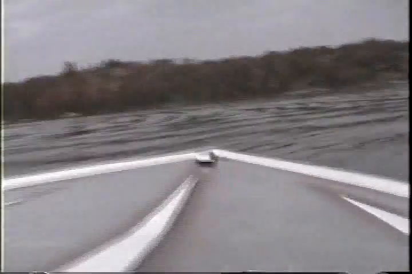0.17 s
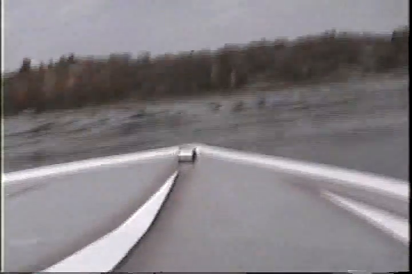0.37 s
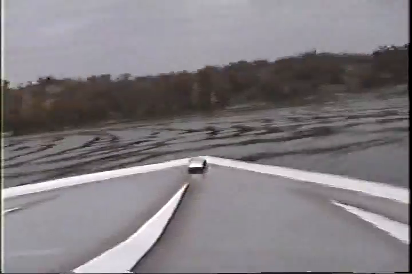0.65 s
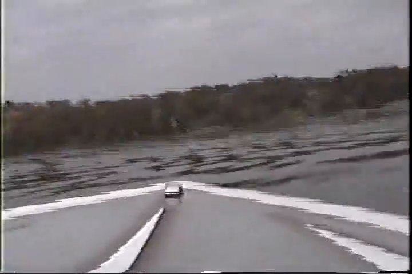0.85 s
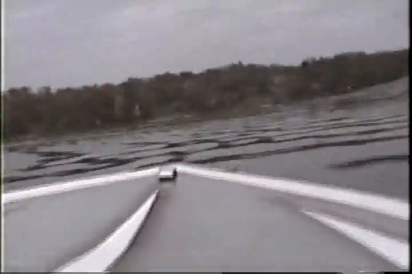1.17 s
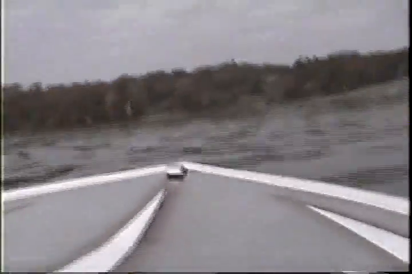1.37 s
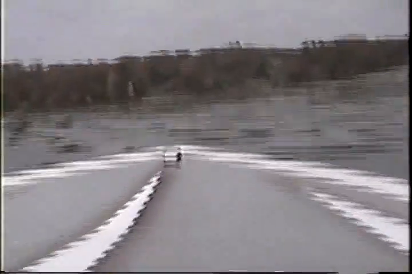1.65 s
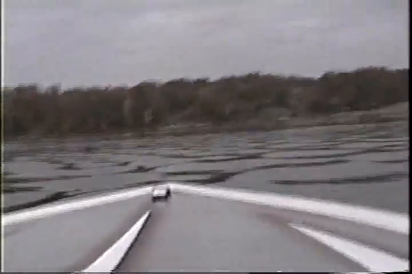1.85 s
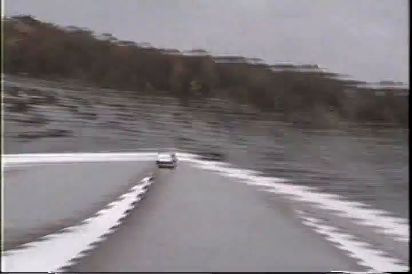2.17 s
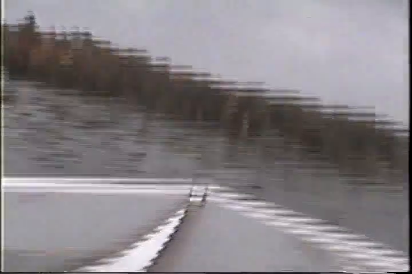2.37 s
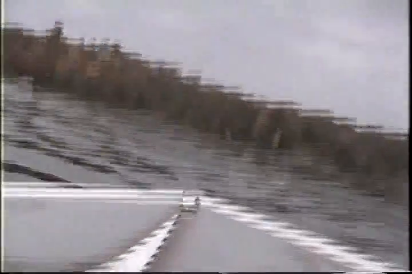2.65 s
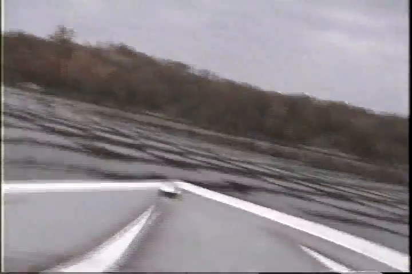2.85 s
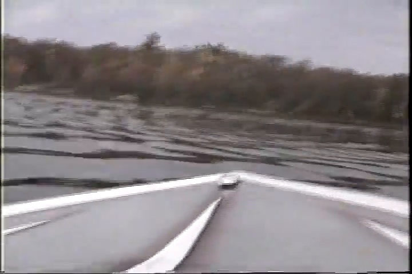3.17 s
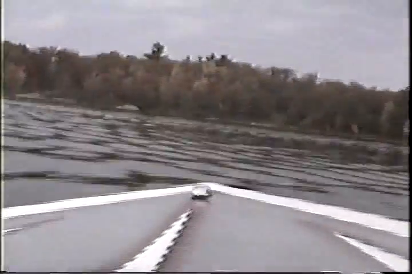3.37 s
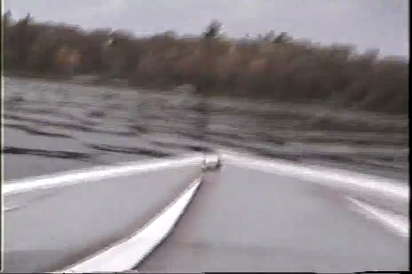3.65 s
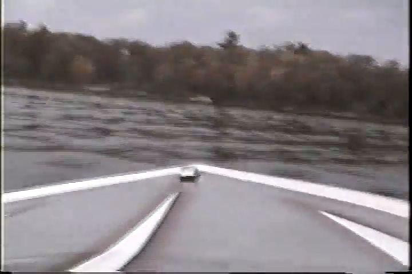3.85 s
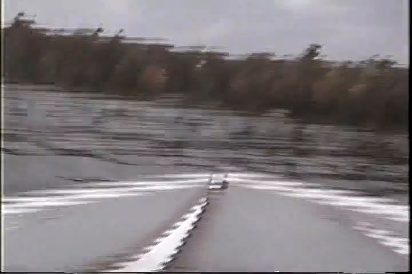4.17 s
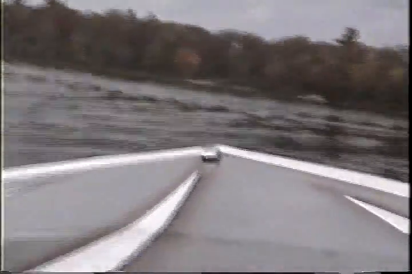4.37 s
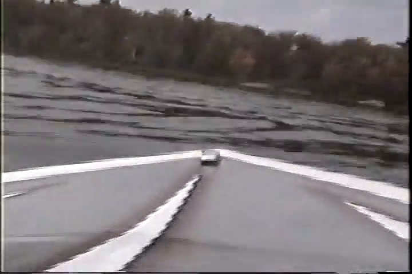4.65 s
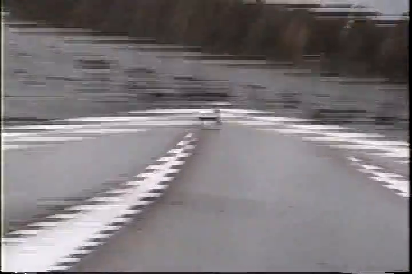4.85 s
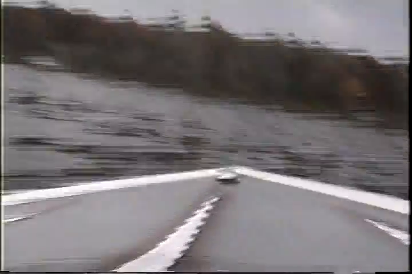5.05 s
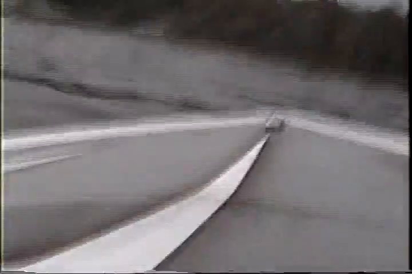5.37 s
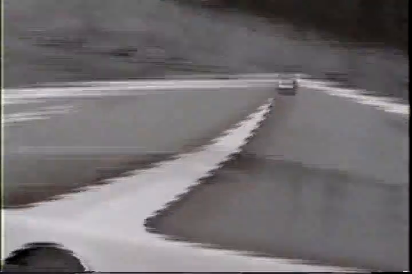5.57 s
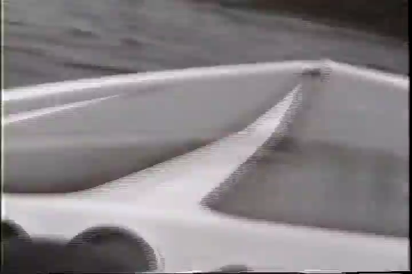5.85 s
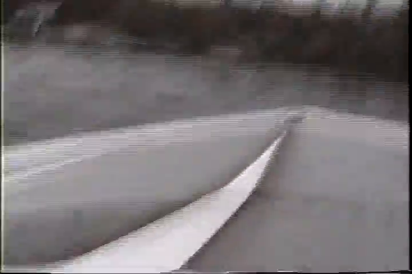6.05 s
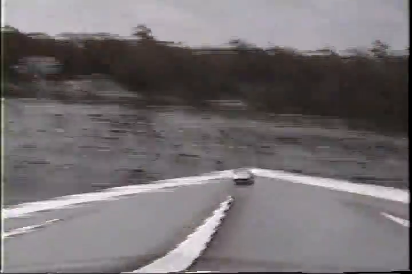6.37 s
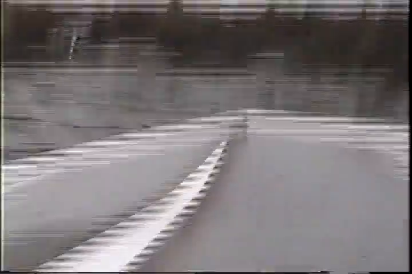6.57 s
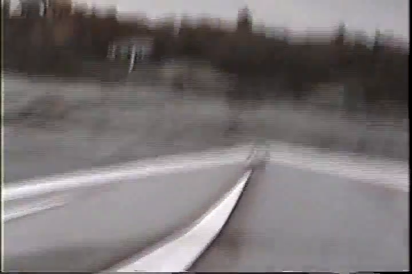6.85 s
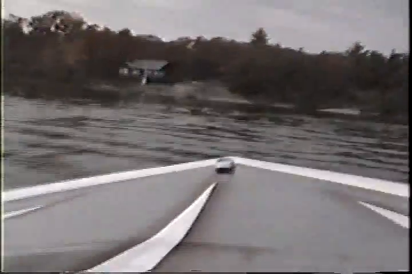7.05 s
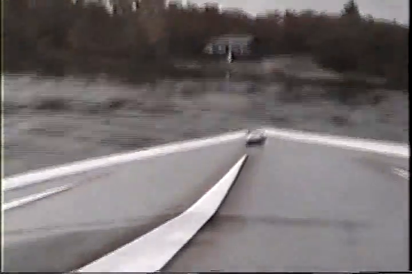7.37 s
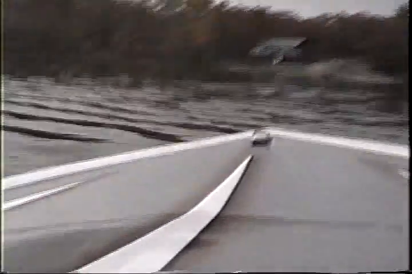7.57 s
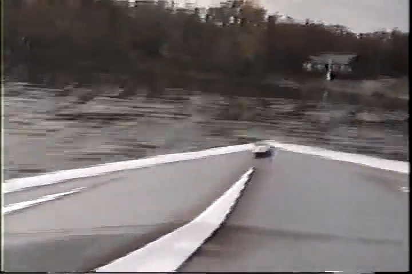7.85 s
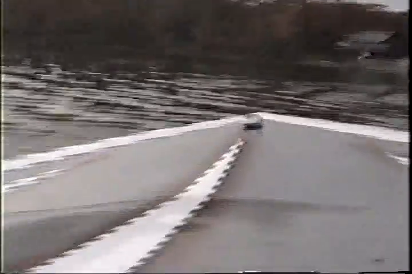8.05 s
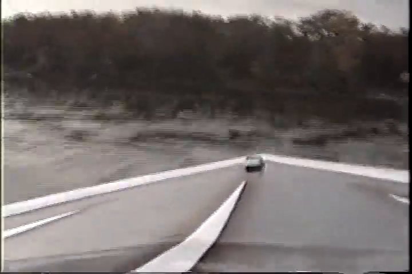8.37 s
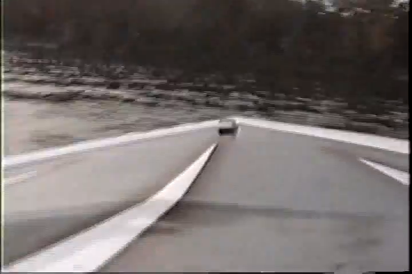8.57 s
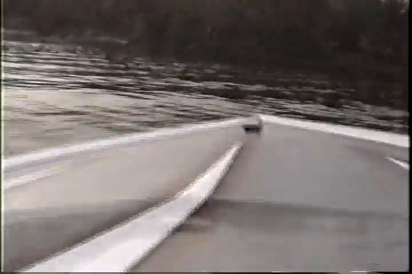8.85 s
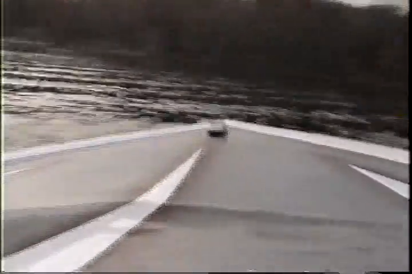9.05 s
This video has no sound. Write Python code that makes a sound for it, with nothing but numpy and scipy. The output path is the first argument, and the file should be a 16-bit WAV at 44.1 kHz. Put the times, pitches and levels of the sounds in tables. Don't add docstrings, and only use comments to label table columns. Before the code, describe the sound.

Open-exhaust V8 boat engine holds a hard, buzzing note that sinks slightly twice, with wash hiss, wind buffets, hull slaps and metallic knocks close by.

```python
import sys
import numpy as np
from scipy import signal
from scipy.fft import rfft, irfft, next_fast_len
from scipy.io import wavfile

SR = 44100
rng = np.random.default_rng(int(sys.argv[2]) if len(sys.argv) > 2 else 0)


def digitize_waveform(pressure):
    field = np.atleast_2d(pressure).T
    bounded = np.clip(field, -1, 1)
    quanta = np.round(bounded * 32767).astype(np.int16)
    wavfile.write(sys.argv[1], SR, quanta)


N = 406161
T = np.arange(N) / SR


def undb(db):
    return np.exp(np.asarray(db) * np.log(10) / 20)


def unit(x):
    return x / np.sqrt(np.mean(np.abs(x) ** 2))


def curve(table):
    s, value = np.transpose(table)
    return np.interp(T, s, value)


def hiss():
    return rng.standard_normal(N)


def colour(x, points):
    hz, db = np.transpose(points)
    size = next_fast_len(N)
    log_f = np.log(np.arange(size // 2 + 1) * SR / size + 1)
    gain = undb(np.interp(log_f, np.log(hz), db))
    return unit(irfft(rfft(x, size) * gain, size)[:N])


def sieve(x, order, hz, kind):
    return signal.sosfilt(signal.butter(order, hz, kind, fs=SR, output="sos"), x)


def band(x, lo_hz, hi_hz):
    return unit(sieve(x, 2, [lo_hz, hi_hz], "band"))


def walk(rate):
    levels = rng.standard_normal(1000)
    return np.interp(T * rate, np.arange(len(levels)), levels)


def grains(per_s, spread_db):
    return (rng.random(N) < per_s / SR) * hiss() * undb(spread_db * rng.exponential(size=N))


def bursts(events, floor_db, rise_s, fall_s):
    gain = undb(floor_db + 1.3 * walk(2.0))
    for s, db in events:
        gain = gain + undb(db) * np.exp(np.where(T < s, (T - s) / rise_s, (s - T) / fall_s))
    return gain


# frequency in Hz, level in dB per Hz.
MURMUR_SPECTRUM = [(5, 0), (60, -12), (250, -26), (1000, -30), (4000, -35), (16000, -42)]


def murmur():
    return undb(-82) * colour(hiss(), MURMUR_SPECTRUM)


def scan_whistle():
    return undb(-66) * np.sin(2 * np.pi * 15734.3 * T + .8 * walk(60)) * undb(3 * walk(40))


# time in seconds, peak in dB.
TAPE_DROPOUTS = [(0.727, -47), (2.6, -43), (2.6662, -45), (3.0998, -42.5), (4.5345, -52), (5.3022, -47.5),
                 (5.6026, -45.5), (5.7687, -46.5), (5.9862, -41.5), (6.7036, -55), (6.8206, -45),
                 (7.9383, -51.5), (8.252, -40), (8.3553, -49.5), (8.3718, -49.5), (0.6973, -49.5),
                 (0.9862, -54), (5.7035, -50)]


def dropouts():
    s, db = np.transpose(TAPE_DROPOUTS)
    lag_s, lift_db = .0015, 22.5
    out = np.zeros(N)
    out[((s + lag_s) * SR).astype(int)] = undb(db + lift_db)
    return sieve(out, 1, 6000, "high")


# time in seconds, peak in dB.
WIND_GUSTS = [(.1, -41), (.7, -56), (1.2, -48), (1.42, -26), (1.9, -39.5), (2.38, -43.5), (3.56, -39),
              (4.8, -40), (5.18, -29.5), (5.3, -35), (5.85, -25.5), (6.05, -38), (6.44, -26.5), (6.85, -24),
              (7.03, -37), (7.26, -36), (7.46, -44), (8.54, -31), (9.2, -54)]


def wind():
    return bursts(WIND_GUSTS, -54.5, rise_s=0.12, fall_s=0.021) * band(hiss(), 21, 73)


# time in seconds, peak in dB.
HULL_SLAPS = [(.3, -23.5), (1.25, -39), (2.35, -34), (2.7, -40), (3.0, -31.5), (3.3, -26), (4.0, -26),
              (4.8, -31.5), (5.3, -21), (5.85, -24), (6.2, -24.5), (6.38, -39), (6.5, -27.5), (6.9, -28.5),
              (7.05, -28), (7.95, -27), (1.1, -27.5), (2.05, -30.5)]


def slap_force():
    return bursts(HULL_SLAPS, -39.5, rise_s=0.055, fall_s=0.15)


def hull(slap):
    return slap * band(hiss(), 55, 220)


# time in seconds, peak in dB.
SPRAY_SHEETS = [(3.99, -59), (4.82, -56), (5.16, -52), (5.86, -51.5), (5.95, -51.5), (6.06, -54),
                (6.135, -62), (6.22, -61), (6.43, -58), (6.52, -54.5), (7.01, -62), (7.14, -63),
                (7.23, -74)]


def sheets():
    return bursts(SPRAY_SHEETS, -71.5, rise_s=0.017, fall_s=0.027) * band(hiss(), 6900, 8900)


def valve(cycle):
    turn = cycle + 1 - .33
    size_db = -9.5 + 4 * rng.standard_normal(400)[turn.astype(int)]
    return undb(size_db) * np.exp(-(turn % 1) / 0.13)


# frequency in Hz, level in dB per Hz.
SPRAY_SPECTRUM = [(1180, -25), (2000, -11), (2180, -9), (2610, -12.5), (2740, -8.5), (3480, -5.5),
                  (4060, -8), (4580, -8), (7580, -15.5), (9710, -20.5), (12800, -35), (15400, -34)]


def spray(cycle, slap):
    swell = undb(0.77 * np.cos(2 * np.pi * cycle) * (-1 + 0.98 * walk(33)) + 1.2 * walk(13))
    swell = swell * (1 + valve(cycle))
    patter = np.minimum(signal.lfilter([1], [1, -.99], np.abs(grains(150, 2.9))), 2.2)
    wash = colour(unit(swell * hiss()) + 0.5 * unit(patter * hiss()), SPRAY_SPECTRUM)
    level_db = -50.5 + 8 * np.exp(-T / 2.77)
    return undb(level_db) * (1 + 2 * slap) * wash


def ring(hz, t):
    overtone = undb(-13.5) * np.exp(-t / 0.0029) * np.sin(2 * np.pi * 1.2 * hz * t)
    return np.sin(2 * np.pi * hz * t) + overtone


# time in seconds, peak in dB, ring in Hz, bright edge in dB.
DRY_TICKS = [(0.183, -26, 3900, -40), (0.2675, -33, 4280, -40), (0.324, -33, 3920, -32),
             (0.382, -39, 4400, -33), (0.5548, -28.5, 4550, -31.5), (0.6468, -26, 3860, -28.5),
             (0.726, -30, 5670, -21.5), (1.0114, -27, 3900, -28.5), (1.544, -31, 3580, -30.5),
             (1.8273, -29.5, 3930, -30.5), (2.592, -30.5, 4500, -26), (2.81, -32, 3920, -33),
             (4.273, -31.5, 4120, -23), (5.243, -25.5, 6350, -34), (5.2613, -25, 4520, -34.5),
             (5.757, -26.5, 5630, -31), (5.981, -28.5, 3550, -30.5), (6.133, -30, 3900, -25.5),
             (6.504, -25, 4130, -35), (6.896, -27.5, 3850, -32), (7.802, -37, 3710, -12.5),
             (8.247, -24.5, 6520, -25.5), (8.453, -25.5, 3700, -38.5), (8.9466, -32.5, 6130, -34),
             (0.582, -26.5, 3340, -29), (0.928, -30, 4280, -34), (0.9835, -27.5, 3500, -27.5),
             (1.3648, -30, 3630, -34), (1.57, -28.5, 3300, -35), (2.0674, -34, 3550, -32),
             (2.251, -36, 3200, -27), (5.7423, -35.5, 6000, -32), (6.4278, -41, 7770, -30),
             (6.667, -41, 3300, -27), (7.1676, -41.5, 5000, -32), (0.0938, -36.5, 3520, -31),
             (1.7898, -36.5, 4040, -34), (2.6524, -33.5, 4000, -34.5), (3.1197, -37, 3810, -32),
             (4.5905, -39, 4080, -34.5), (4.866, -34, 3230, -34), (5.2465, -29, 4800, -31),
             (6.51, -37.5, 7900, -30.5), (7.236, -24, 2900, -35), (7.2316, -35, 8300, -33),
             (9.1157, -38.5, 4700, -31), (8.476, -32, 3600, -33), (8.513, -35, 4000, -33),
             (6.483, -38, 7600, -32)]
# time in seconds, peak in dB, ring in Hz, ring share from 0 to 1.
RINGING_KNOCKS = [
    (6.557, -26.5, 7900, 0.6),
    (7.2393, -19.5, 4100, 0.8),
    (7.463, -15.5, 6440, 0.6),
    (7.842, -21.5, 6260, 0.5),
    (8.252, -18, 6440, 0.9),
]


def ticks():
    out, t = np.zeros(N + SR), np.arange(SR // 10) / SR
    knocks = [(s, db, hz, .14, top_db) for s, db, hz, top_db in DRY_TICKS]
    knocks += [(*row, -32) for row in RINGING_KNOCKS]
    for s, db, hz, share, top_db in knocks:
        noise = rng.standard_normal(len(t))
        edge = sieve(noise, 3, 11000, "high") * 1.5 * 1000. ** (-t / 0.0059)
        snap = sieve(noise, 4, [2200, 5000 + .7 * hz], "band")
        snap = snap + 1.6 * sieve(noise, 2, [.78 * hz, 1.25 * hz], "band")
        metal = ring(hz, t) * 1000. ** (-t / .035)
        body = share * metal + (1 - share) * snap * np.exp(-t / 0.0056)
        body = body * 1000. ** (-t / 0.057) * (1 - np.exp(-t / 0.0021))
        start = int(s * SR)
        out[start:start + len(t)] += undb(db) * (body + undb(top_db) * edge)
    return out[:N]


# time in seconds, firing rate in Hz.
FIRING_RATE = [(0, 279.7), (1.0, 277.8), (1.25, 272.9), (1.5, 265.2), (1.75, 261.4), (2.0, 259.6),
               (2.6, 257.6), (3.25, 256.6), (5.0, 256.7), (5.17, 256.8), (5.31, 247.8), (5.45, 242.6),
               (5.59, 240.8), (5.85, 239.3), (6.7, 239.8), (7.4, 238.5), (8.4, 237.6), (9.21, 237.9)]


def crankshaft(hz):
    return np.cumsum(hz * (1 + .0007 * walk(14))) / 8 / SR


# strength in dB, lateness in firings.
CYLINDER_ORDER = [(3, 0.0107), (-5.5, 0.12), (-4.5, 0.1006), (-1, 0.018), (-7, 0.094), (5, 0), (-1, 0),
                  (-6.5, 0.14)]


def puffs(cycle, length, scatter_db):
    firing = (8 * cycle).astype(int)
    db = np.array(CYLINDER_ORDER)[firing % 8, 0] + scatter_db * rng.standard_normal(4000)[firing]
    return undb(db) * np.exp(-(8 * cycle % 1) / length)


def cracks(cycle):
    firing = (8 * cycle).astype(int)
    at = np.flatnonzero(np.diff(firing))
    cylinder = firing[at + 1] % 8
    size, slip = rng.standard_normal((len(at), 2)).T
    db, late = np.array(CYLINDER_ORDER)[cylinder].T
    path = 40 * rng.random(8)[cylinder]
    delay = np.clip(late * 170 + path + 1.2 * slip + 13, 0, 400).astype(int)
    pulses = np.zeros(N + SR)
    pulses[at + delay] = undb(.7 * db + 2.8 * size)
    return band(pulses[:N], 1500, 2670)


# frequency in Hz, level in dB per Hz.
ROAR_SPECTRUM = [(30, -15), (60, -8), (150, -5), (300, -5.5), (470, -9), (700, -9.5), (1100, -17),
                 (1600, -24.5), (2500, -42), (4000, -41), (8000, -62.5)]
# time in seconds, level in dB.
FRONT_SHARPNESS = [(0, -20.5), (1, -22), (2, -21), (3.2, -23.5), (4.4, -21.5), (5, -22), (6.2, -22),
                   (7, -22), (8.2, -20.5), (8.5, -19), (9.21, -20)]
ENGINE_SPEEDS = [
    239,
    257,
    278,
]
ROAR_LEVELS = [
    -26.5,
    -26.2,
    -24,
]


def roar(cycle, hz, slap):
    gas = colour((1.4 + puffs(cycle, .5, 3.6)) * hiss(), ROAR_SPECTRUM)
    gas = undb(-1) * gas * undb(1.4 * walk(5))
    fronts = undb(curve(FRONT_SHARPNESS) + .6 * walk(5)) * cracks(cycle)
    level = undb(np.interp(hz, ENGINE_SPEEDS, ROAR_LEVELS))
    return level * (1 + 2.6 * slap) * (gas + fronts)


# time in seconds, firing note in dB.
ENGINE_LOAD = [(0, -21), (.6, -21.5), (1.4, -18), (2.1, -17.5), (2.5, -17.5), (5.2, -17), (5.4, -18.5),
               (7.7, -18.5), (9.21, -17)]
FAST_ORDERS = [-32, -8, -13, -12, -8, -10, -17, 0, -17, -12, -14, -20, -13, -18, -28, -25, -18, -25, -16,
               -27, -24, -32, -27, -30, -25, -27, -22, -24, -19, -17, -34, -23, -23, -37, -20, -25, -35,
               -29, -30, -29, -31, -36, -26, -33, -34, -37, -36, -33, -40, -36, -40, -42, -41, -44, -46,
               -43, -45, -45, -50, -50, -46, -50, -43, -40]
CRUISE_ORDERS = [-34, -14, -18, -16, -9, -12, -23, 0, -16, -22, -19, -23, -20, -23, -25, -24, -22, -26, -24,
                 -31, -17, -29, -33, -28, -26, -33, -40, -27, -23, -32, -32, -27, -25, -29, -28, -31, -33,
                 -30, -36, -39, -40, -34, -36, -45, -37, -39, -40, -35, -41, -33, -44, -52, -38, -46, -50,
                 -44, -44, -41, -49, -54, -53, -40, -44, -47]
EASED_ORDERS = [-31, -11, -17, -12, -12, -10, -18, 0, -13, -17, -21, -24, -20, -19, -23, -25, -18, -22, -20,
                -31, -14, -20, -39, -20, -19, -23, -31, -37, -19, -39, -34, -21, -27, -22, -23, -27, -31,
                -26, -36, -32, -33, -26, -37, -32, -39, -31, -41, -38, -38, -45, -52, -54, -41, -50, -53,
                -56, -47, -44, -49, -46, -45, -48, -50, -52]
HULL_SWELLS = {2: [(7.1, 0.067, -3), (13, 0.33, 19.5)], 5: [(2.0, 0.3, -4), (5.1, 1, 3.5)],
               21: [(.4, 0.26, -14), (1.1, 0.37, -7), (2.05, 0.27, 5), (2.7, 0.28, -24), (4.5, 0.96, 1)],
               29: [(.4, 0.25, -2), (1.8, 0.088, 2), (2.05, 0.072, -2), (2.7, 0.21, 7.5), (3.6, 0.29, -7),
               (5.6, 0.37, 1.5)], 3: [(2, 0.31, -7), (5.7, 0.39, -8)], 4: [(1.3, 0.2, 4)],
               6: [(1.4, 0.22, -5), (1.1, .1, 5), (3.75, .2, 3), (5.2, .2, -3)], 8: [(.55, 0.14, 1.5),
               (6.4, 0.65, 1.2), (7.7, .5, 0.55)], 11: [(1.7, 0.87, -2)], 13: [(1.2, .4, -4), (3, .7, -3.5),
               (5.6, 0.33, -4), (7, 0.16, -6.5)], 15: [(1.3, 1.4, -13.5), (6.6, 0.49, 0.5)],
               18: [(1.1, 0.43, -1), (6.3, 0.88, -6)], 19: [(5.3, .5, -0.5)], 22: [(1.6, 0.53, 7.5),
               (5.5, .4, 7.6)], 27: [(2, 0.24, 19)], 28: [(7.3, 1.5, -7)], 30: [(1.3, 0.27, -3)],
               32: [(1.2, 0.92, -10), (2.6, .3, 8), (3.4, .3, 1)], 33: [(1.5, .8, -5.5)],
               35: [(1.3, .4, -11), (2.7, 0.37, -8)], 36: [(1.2, 1.2, -11)], 37: [(1.6, 0.66, 7.1)],
               38: [(1.7, 0.93, -9)]}


def swells(events):
    return sum(db * np.exp(-((T - s) / half_s) ** 2) for s, half_s, db in events)


def drone(cycle, hz):
    strength_db, late = np.transpose(CYLINDER_ORDER)
    fired = np.arange(8) + late
    out, rough = np.zeros(N), np.interp(hz, ENGINE_SPEEDS, [1, 1.1, 1.8])
    for k, levels_db in enumerate(zip(EASED_ORDERS, CRUISE_ORDERS, FAST_ORDERS), 1):
        start = np.angle(np.sum(undb(strength_db) * np.exp(-2j * np.pi * k * fired / 8)))
        start -= 4.73 * (k > 8) + .07 * max(k - 10, 0) * rng.standard_normal()
        depth = .08 if k == 8 else (.1 + .0022 * k) * rough
        trim_db = 0 if k == 8 else -4 if k == 1 else -.7 if k < 18 else .8
        level_db = np.interp(hz, ENGINE_SPEEDS, levels_db) + swells(HULL_SWELLS.get(k, [])) + trim_db
        size = undb(level_db) * (1 + depth * walk(7))
        if k == 8:
            size = size * (1 + .1 * walk(70))
            start = start + .1 * walk(70)
        lead = 2.275 * np.log(k / 8)
        out -= size * np.cos(2 * np.pi * k * cycle + start + depth * walk(7.7) + lead)
    return undb(curve(ENGINE_LOAD)) * np.sqrt(2) * out


def scene():
    hz = curve(FIRING_RATE)
    cycle = crankshaft(hz)
    slap = slap_force()
    water = hull(slap) + sheets() + spray(cycle, slap)
    engine = roar(cycle, hz, slap) + drone(cycle, hz)
    heard = wind() + water + ticks() + engine
    return np.array([0 * heard, 2 * heard])


def top_cut(x):
    return signal.sosfilt(signal.butter(12, 15850, fs=SR, output="sos"), x)


def record(dry):
    right = np.tanh(1.22 * dry[1] - .015) / 1.08
    right = sieve(right, 2, 32, "high")
    right = right * np.minimum((N - np.arange(N)) / (.002 * SR), 1)
    right = right + dropouts() + scan_whistle() + undb(-73.5) * hiss()
    right = signal.sosfilt(signal.ellip(10, .3, 60, 15900, fs=SR, output="sos"), right)
    leak = undb(-50) * signal.lfilter([.3, -.3], [1, -.7], right)
    return top_cut(np.array([leak + murmur(), right]))


dry = scene()
out = record(dry)
digitize_waveform(out)
```